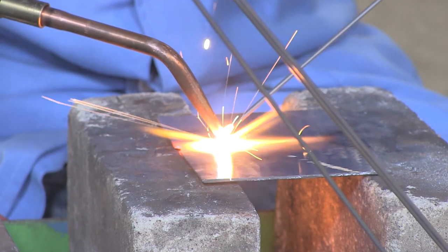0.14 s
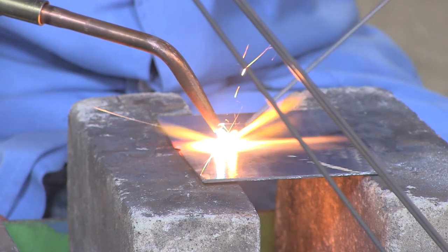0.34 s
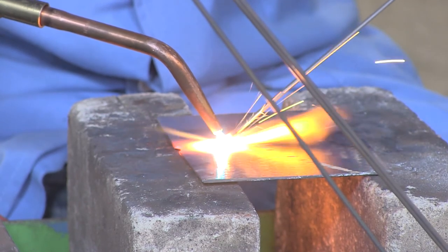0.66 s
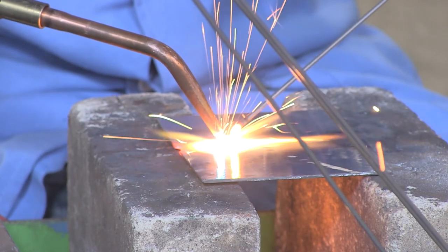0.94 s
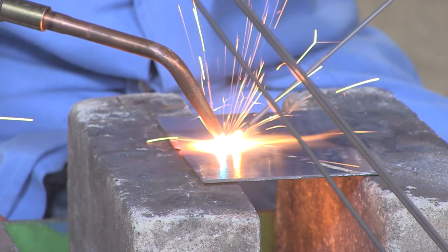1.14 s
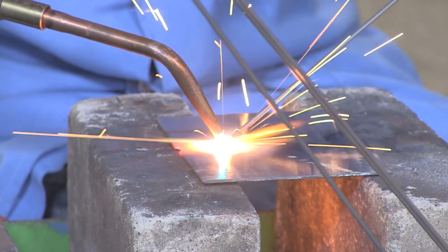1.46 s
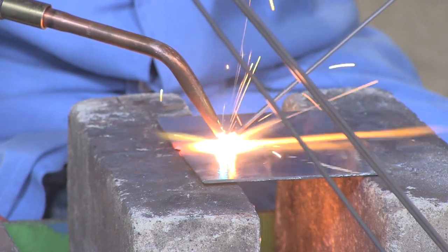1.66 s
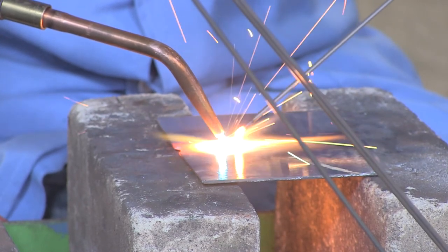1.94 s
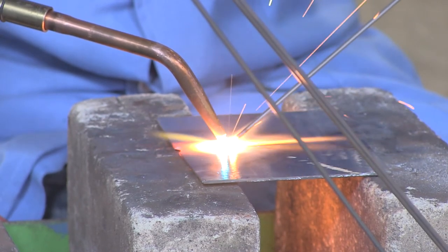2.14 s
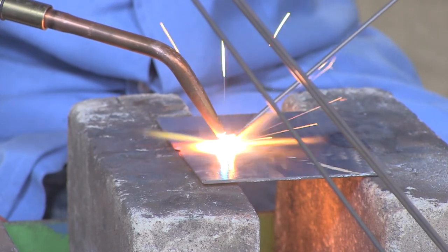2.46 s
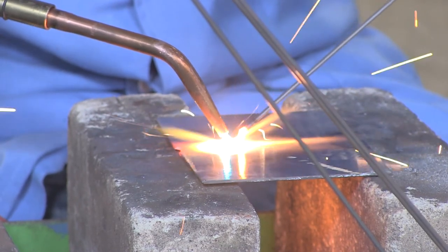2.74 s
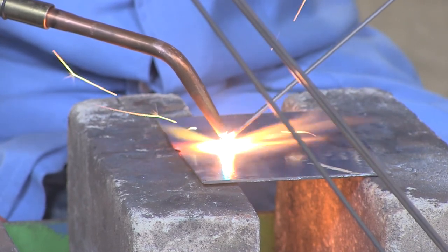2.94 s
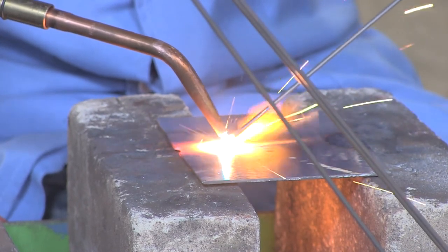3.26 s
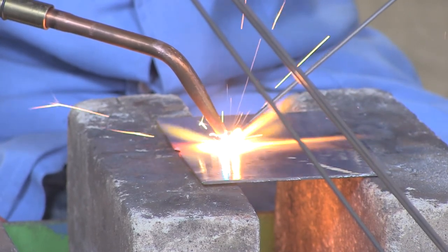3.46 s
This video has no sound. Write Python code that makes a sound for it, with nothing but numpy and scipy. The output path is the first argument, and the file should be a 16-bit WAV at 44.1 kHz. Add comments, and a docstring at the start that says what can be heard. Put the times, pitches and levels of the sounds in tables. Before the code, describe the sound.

Close, dry mono sound of a welding torch: continuous bright, airy hiss with slight flicker and a soft flame rumble, interrupted once by a sharp pop of molten metal, later by short rough puffs.

```python
"""In a dry workshop, a gas welding torch melts a steel sheet close to a mono microphone.
The nozzle hisses very high over the soft roar of the flame: both are layers of coloured random noise.
Two narrow hollows slide through the thin middle treble of the hiss.
The molten pool spits once with a sharp snap, a single pulse with a tiny high ring.
Now and then the flame sputters, most of all near the end: short puffs of rough noise."""
import sys
import numpy as np
from scipy import signal
from scipy.fft import rfft, irfft, next_fast_len
from scipy.io import wavfile
from scipy.ndimage import uniform_filter1d, map_coordinates

SR = 44100
rng = np.random.default_rng(int(sys.argv[2]) if len(sys.argv) > 2 else 0)


def inscribe(sig):
    """Save sig as 16-bit PCM at rate SR to the path in sys.argv[1].

    A 1-D sig is mono; a 2-D sig holds one channel per row.
    Samples are clipped to [-1, 1] before scaling.
    """
    pcm = np.round(np.clip(np.atleast_2d(sig).T, -1, 1) * 32767)
    wavfile.write(sys.argv[1], SR, pcm.astype(np.int16))


N = 158760  # length of the scene in samples (3.6 s)

# How loud the top of the hiss is: (time [s], level [dB])
JET_LEVEL = [(0, -30.5), (.07, -32), (.22, -30), (.48, -30.5), (.6, -29.5), (.82, -31.5), (1.03, -32.5),
             (1.19, -30.5), (1.25, -33.5), (1.49, -34.5), (1.67, -29), (1.77, -30.5), (1.87, -30),
             (2, -31.5), (2.19, -30.5), (2.29, -33.5), (2.38, -30.5), (2.46, -35), (2.73, -27.5),
             (3.04, -30), (3.15, -29.5), (3.33, -29.5), (3.43, -33), (3.6, -31.5)]
# How loud the sizzle just below it is: (time [s], level [dB])
SIZZLE_LEVEL = [(0, -41), (.16, -37.5), (.27, -36), (.52, -40), (.72, -38), (.81, -40), (1.2, -39),
                (1.49, -41.3), (1.72, -35), (1.91, -39), (2.23, -41.5), (2.38, -38), (2.68, -37.5),
                (3.08, -36), (3.2, -38.5), (3.36, -36.8), (3.44, -39), (3.5, -35.5), (3.6, -37)]
# How loud the thin middle treble is: (time [s], level [dB])
SHEEN_LEVEL = [(0, -45.5), (.1, -49), (.29, -43.8), (.52, -46), (.8, -50), (1.6, -49.6), (1.73, -46),
               (2.15, -47.2), (2.4, -48), (2.95, -47), (3.04, -45.5), (3.3, -49.5), (3.6, -48.5)]
# How loud the gas rushing over the sheet is: (time [s], level [dB])
WASH_LEVEL = [(0, -47.5), (.1, -50), (.18, -46), (.53, -47.5), (.78, -48.5), (1.2, -47), (1.25, -49.5),
              (1.63, -49.5), (1.71, -46.5), (2.05, -46.5), (2.22, -46), (2.48, -48), (2.58, -45),
              (2.75, -46), (3, -45), (3.12, -46.5), (3.6, -48)]
# How loud the flame's roar is: (time [s], level [dB])
ROAR_LEVEL = [(0, -52.5), (.2, -49.5), (.72, -50), (.88, -52), (1.15, -51.5), (1.4, -54.5), (1.75, -49.5),
              (2, -52.5), (2.3, -53), (2.8, -50), (3.15, -50.5), (3.35, -50.5), (3.6, -48.5)]

# Tone colour of each noise layer: (frequency [Hz], relative strength [dB per Hz])
JET_SPECTRUM = [(11300, -19), (12100, -9), (12650, 2), (13500, 4), (14250, 3), (14900, 5), (15300, -0.5),
                (15750, -1)]
SIZZLE_SPECTRUM = [(8700, -25), (9200, -8), (9500, -5), (9900, 1.5), (10200, -1.5), (10550, -1),
                   (10850, -0.5), (11250, 1), (12000, -2), (13000, -14.5), (15000, -14)]
SHEEN_SPECTRUM = [(5300, -43), (5800, -4.5), (6100, -2), (6550, 0), (7020, 0), (7300, 1), (7850, -1),
                  (8270, 4.5), (8700, 0.5), (9100, -4), (10500, -21.5)]
WASH_SPECTRUM = [(400, -15.5), (900, -6.5), (1400, -7), (2300, -11), (3100, -3), (4000, -2), (4600, 1),
                 (5350, 3), (5600, 2), (5950, -9), (7000, -40)]
ROAR_SPECTRUM = [(25, -38), (40, -22), (60, -6.5), (85, 0.5), (120, 2.5), (200, 0), (320, -2.5), (600, -8),
                 (1300, -12.5), (2200, -16.5), (4000, -20.5)]

# Paths of two narrow hollows through the middle treble: (time [s], centre [Hz])
LOW_HOLLOW_PATH = [(0, 7200), (.45, 6880), (.7, 6560), (1.2, 7040), (1.27, 5900), (1.62, 5760),
                   (1.69, 7260), (3.6, 7000)]
HIGH_HOLLOW_PATH = [(0, 8650), (.17, 8650), (.3, 9400), (.7, 8800), (1.5, 8900), (1.75, 8260), (2.1, 8800),
                    (2.4, 8640), (2.85, 8560), (3.1, 8470), (3.6, 8600)]

# Sputters of the flame; each gets duller above its last column:
# (centre time [s], half length [s], level [dB], dulling frequency [Hz])
SPUTTER_EVENTS = [(0.163, 0.016, -49, 600), (0.297, .015, -51, 700), (.73, 0.034, -51.5, 600),
                  (1.711, 0.011, -45, 900), (2.088, 0.038, -52, 700), (3.238, 0.0044, -43, 500),
                  (3.276, .004, -42.5, 1200), (3.347, 0.019, -51.5, 1100), (3.376, 0.0053, -39, 1000),
                  (3.41, 0.022, -35.5, 4530), (3.453, 0.0056, -35, 3000), (3.469, 0.014, -43, 550)]
# Tone colour of the sputters: (frequency [Hz], relative strength [dB per Hz])
SPUTTER_SPECTRUM = [(50, -30), (130, -1.5), (320, 1.5), (530, -2.5), (700, -8.5), (920, 0), (1400, -3.5),
                    (1900, -1.5), (2500, -5), (3000, -4.5), (3900, -6), (4700, 0.5), (5450, 0), (6000, -12),
                    (9000, -16)]
# Tone colour of the snap: (frequency [Hz], relative strength [dB])
SNAP_SPECTRUM = [(20, -53), (45, -33), (70, -16), (95, -8), (120, -1.5), (200, -4), (400, -1), (800, 2),
                 (1500, -0.5), (2400, -6.5), (3300, -12.5), (4500, -19.5), (9000, -19), (15000, -22)]

# Slow drift of colour and fast flicker of level, both in dB
JET_DRIFT_DB, SIZZLE_DRIFT_DB, WASH_DRIFT_DB, ROAR_DRIFT_DB = -0.2, 1.03, 0.5, 0.1
JET_FLICKER_DB, SIZZLE_FLICKER_DB, WASH_FLICKER_DB, ROAR_FLICKER_DB = 0.86, 0.96, 0.76, 1.27
FLICKER_PER_S = 45  # new random values a second
FLUTTER_DB, FLUTTER_PER_S = 0.88, 320  # faster unrest shared by jet and sizzle

HOLLOW_DB, HOLLOW_WIDTH_HZ = -7.5, 170
HOLLOW_VARY, HOLLOW_PER_S = 0.41, 7.27  # how much and how often their depth changes
SPUTTER_ROUGH_DB, SPUTTER_PER_S = 1.9, 500
SNAP_S, SNAP_DB = 1.2066, -3.5
RING_DB, RING_HZ, RING_DECAY_S = -17, 14400, 0.00068
TOP_HZ = 15750


def amp(db):
    """Turn decibels into a plain multiplier."""
    return 10 ** (np.asarray(db) / 20)


def unit(x):
    """Scale to an average (rms) strength of 1."""
    return x / np.sqrt(np.mean(x ** 2) + 1e-20)


def colour(points, hz):
    """Read a multiplier from a spectrum table on a log axis; almost silent outside the table."""
    f, db = np.transpose(points)
    return amp(np.interp(np.log(hz + 1), np.log(f + 1), db, left=-120, right=-120))


def curve(rows):
    """Join (time, value) rows with straight lines, one value per sample."""
    return np.interp(np.arange(N) / SR, *np.transpose(rows))


def wobble(rate):
    """A smooth random curve through `rate` random values a second."""
    random_values = rng.standard_normal(N // 8)
    return map_coordinates(random_values, [np.arange(N) * rate / SR], mode="wrap")


def filtered(x, response):
    """Strengthen or weaken each frequency of x by response(hz)."""
    size = next_fast_len(N + SR // 2)  # spare room keeps the end from wrapping onto the start
    gain = response(np.fft.rfftfreq(size, 1 / SR))
    return irfft(rfft(x, size) * gain, size)[..., :N]


def turbulence(spectrum, drift_db, flicker_db):
    """Noise of unsteady gas: its bands drift slowly while its overall level flickers."""
    bands = signal.stft(rng.standard_normal(N), nperseg=512)[2]
    drift = rng.standard_normal(bands.shape)
    for _ in range(2):  # smooth over neighbouring bands, then over time
        drift = uniform_filter1d(drift, size=4, axis=0)
        drift = uniform_filter1d(drift, size=45, axis=1)
    drifting = bands * amp(drift_db * unit(drift))
    noise = signal.istft(drifting, nperseg=512)[1][:N]
    coloured = filtered(noise, lambda hz: colour(spectrum, hz))
    return unit(coloured * amp(flicker_db * wobble(FLICKER_PER_S)))


def hollowed(x):
    """Narrow dips slide through the treble as the torch moves, while their depth varies at random."""
    hz, t, bands = signal.stft(x, SR, nperseg=1024)
    for path in (LOW_HOLLOW_PATH, HIGH_HOLLOW_PATH):
        centre_hz = np.interp(t, *np.transpose(path))
        offset = (hz[:, None] - centre_hz) / HOLLOW_WIDTH_HZ
        variation = np.interp(t * SR, np.arange(N), wobble(HOLLOW_PER_S))
        depth = np.abs(1 + HOLLOW_VARY * variation)
        bands = bands * amp(HOLLOW_DB * depth * np.exp(-0.5 * offset ** 2))
    return signal.istft(bands, SR, nperseg=1024)[1][:N]


def hiss():
    """The jet leaves the nozzle and spreads over the hot sheet: four layers of gas noise."""
    jet = amp(curve(JET_LEVEL)) * turbulence(JET_SPECTRUM, JET_DRIFT_DB, JET_FLICKER_DB)
    sizzle_noise = turbulence(SIZZLE_SPECTRUM, SIZZLE_DRIFT_DB, SIZZLE_FLICKER_DB)
    sizzle = amp(curve(SIZZLE_LEVEL)) * sizzle_noise
    # the sheen drifts like the sizzle and flickers like the wash
    sheen_noise = turbulence(SHEEN_SPECTRUM, SIZZLE_DRIFT_DB, WASH_FLICKER_DB)
    sheen = amp(curve(SHEEN_LEVEL)) * unit(hollowed(sheen_noise))
    wash = amp(curve(WASH_LEVEL)) * turbulence(WASH_SPECTRUM, WASH_DRIFT_DB, WASH_FLICKER_DB)
    flutter = unit(amp(FLUTTER_DB * wobble(FLUTTER_PER_S)))
    return (jet + sizzle) * flutter + sheen + wash


def roar():
    """The low, fluttering noise of burning gas."""
    return amp(curve(ROAR_LEVEL)) * turbulence(ROAR_SPECTRUM, ROAR_DRIFT_DB, ROAR_FLICKER_DB)


def sputters():
    """Short ragged puffs when the melt disturbs the flame: noise that swells and fades as a bell curve."""
    t = np.arange(N) / SR
    puffs = np.zeros(N)
    for centre_s, half_s, level_db, dull_hz in SPUTTER_EVENTS:
        def response(hz):
            return colour(SPUTTER_SPECTRUM, hz) / np.hypot(1, (hz / dull_hz) ** 2)

        noise = unit(filtered(rng.standard_normal(N), response))
        swell = np.exp(-0.5 * ((t - centre_s) / half_s) ** 2)
        puffs += amp(level_db) * swell * noise
    roughness = unit(amp(SPUTTER_ROUGH_DB * wobble(SPUTTER_PER_S)))
    return puffs * roughness


def pulse(spectrum, size=8192):
    """A pulse of peak 1 with the given spectrum, its energy packed as early as possible."""
    f, db = np.transpose(spectrum)
    hz = np.fft.rfftfreq(size, 1 / SR)
    gain = amp(np.interp(np.log(hz + 1), np.log(f), db))
    # keeping only the first half of the cepstrum makes the pulse begin at once (minimum phase)
    cepstrum = irfft(np.log(gain))
    wave = irfft(np.exp(rfft(2 * cepstrum[:size // 2], size)))
    return wave / np.abs(wave).max()


def snap():
    """A bead of melt bursts: one dry pulse with a short low tail and a brief high ring."""
    wave = -amp(SNAP_DB) * pulse(SNAP_SPECTRUM)
    t = np.arange(len(wave)) / SR
    ring = amp(RING_DB) * np.exp(-t / RING_DECAY_S) * np.sin(2 * np.pi * RING_HZ * t)
    return np.pad(wave + ring, (round(SNAP_S * SR), N))[:N]


def scene():
    """Add all the sounds; one close microphone feeds both channels alike."""
    mono = hiss() + roar() + sputters() + snap()
    return np.array([mono, mono])


def record(dry):
    """The recorder keeps only the frequencies below its band limit."""
    return filtered(dry, lambda hz: hz < TOP_HZ)


dry = scene()
out = record(dry)
inscribe(out)
```